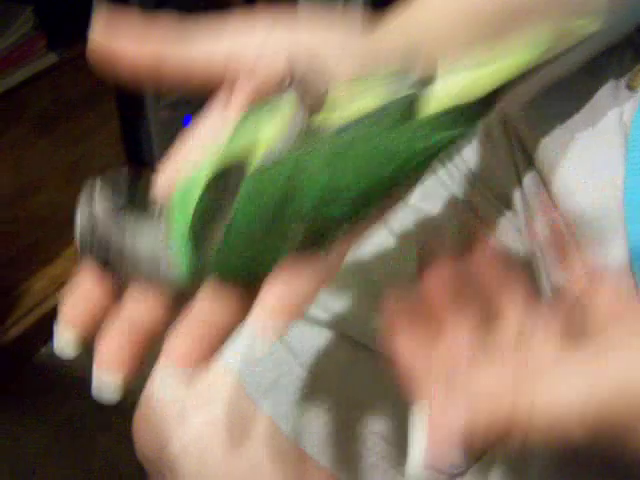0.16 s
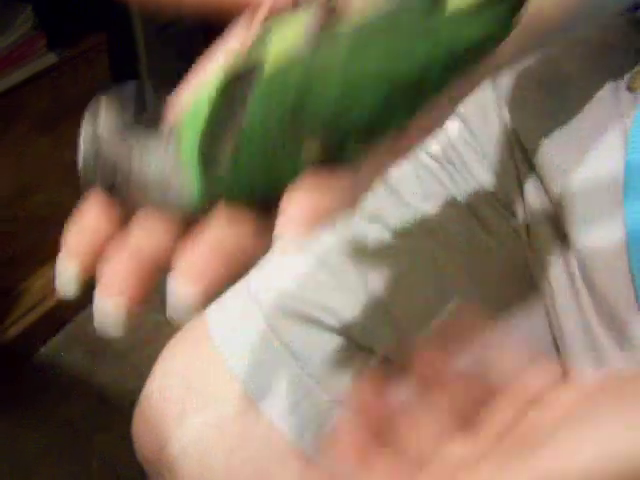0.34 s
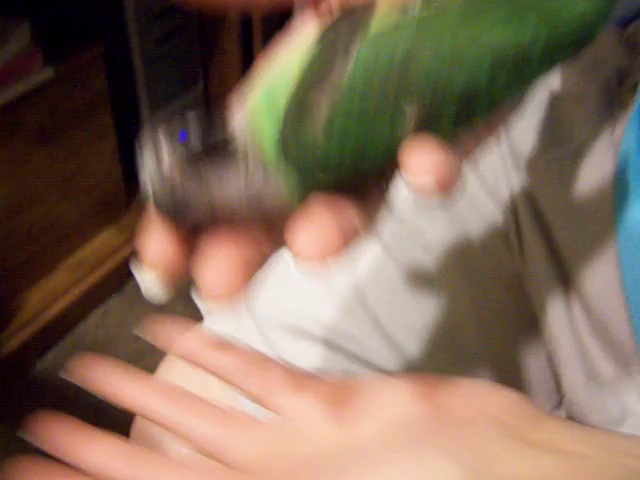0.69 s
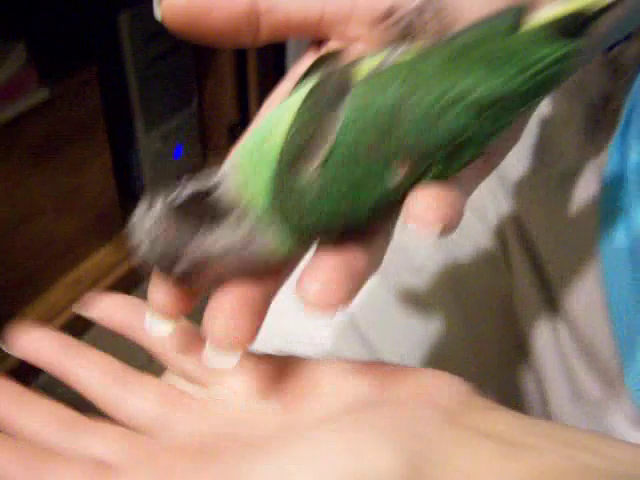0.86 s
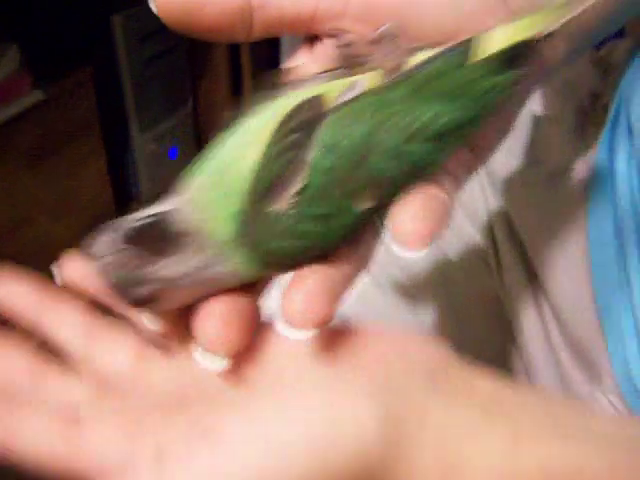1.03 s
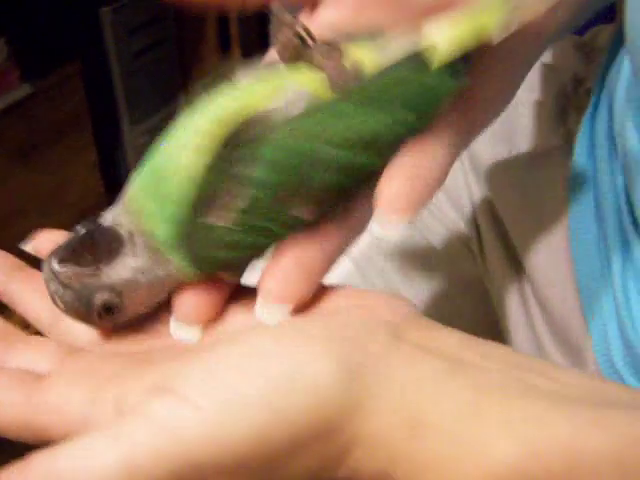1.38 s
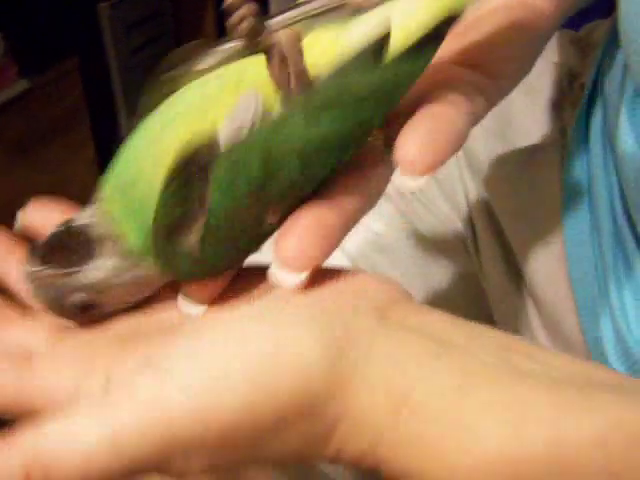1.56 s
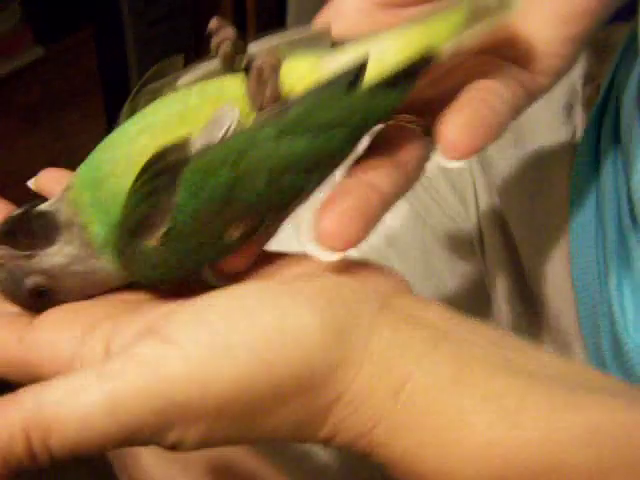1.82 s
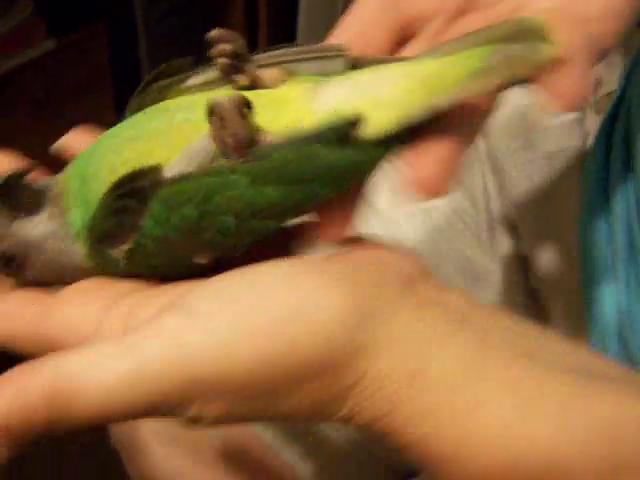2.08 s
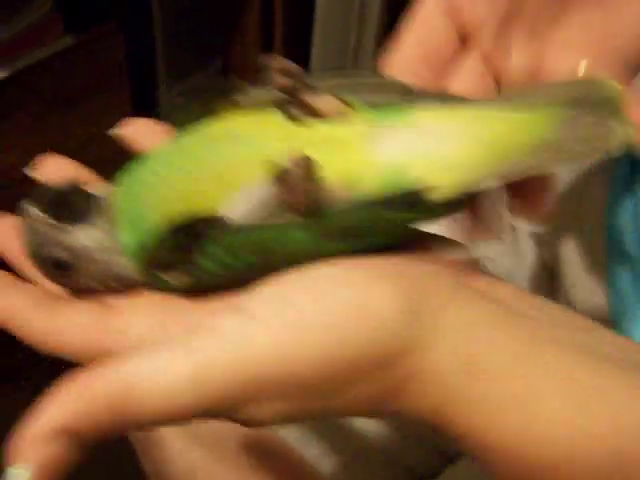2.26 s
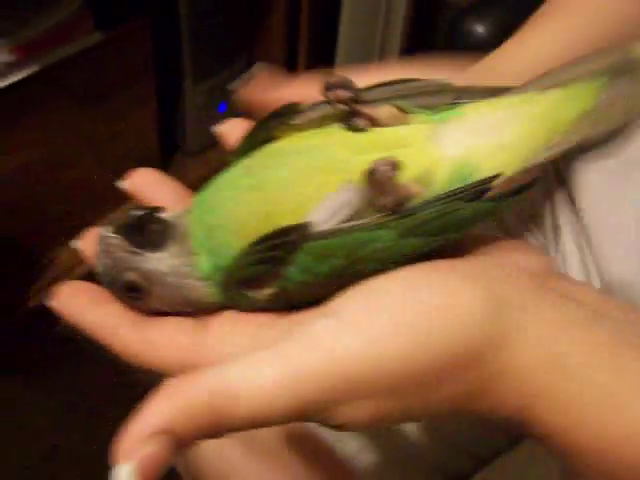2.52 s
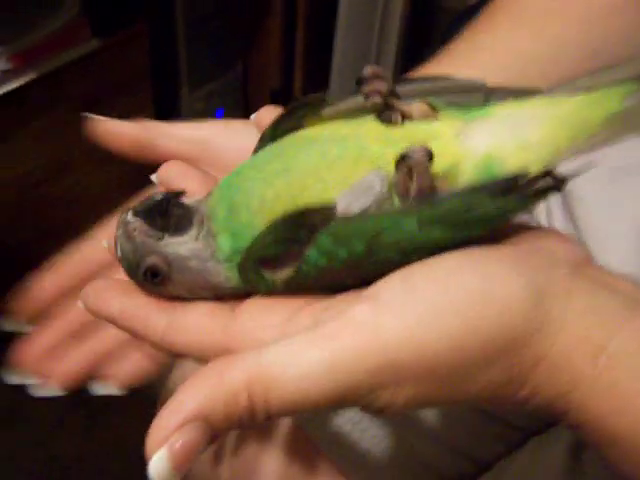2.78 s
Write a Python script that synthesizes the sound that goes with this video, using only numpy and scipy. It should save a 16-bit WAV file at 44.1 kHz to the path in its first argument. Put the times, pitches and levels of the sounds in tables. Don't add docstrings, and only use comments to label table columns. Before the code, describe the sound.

Quick parrot chirps rise, fall and overlap for the first stretch, thin out, then return with upward glides and a loud arched squeak, over constant soft appliance hum in a short-echo living room, narrow-band microphone.

```python
import sys
import numpy as np
from scipy import signal
from scipy.fft import rfft, irfft, next_fast_len
from scipy.io import wavfile
from scipy.ndimage import uniform_filter1d, map_coordinates

SR = 44100
rng = np.random.default_rng(int(sys.argv[2]) if len(sys.argv) > 2 else 0)


def invert_db(level):
    return 10 ** (np.asarray(level, dtype=float) / 20)


def master_out(mix):
    frames = np.transpose(np.atleast_2d(mix))
    ceiling = np.clip(frames, -1, 1)
    pcm = np.round(ceiling * 32767).astype(np.int16)
    wavfile.write(sys.argv[1], SR, pcm)


N = 127890


def unit(x):
    return x / np.sqrt(np.mean(x ** 2) + 1e-20)


def along(points, hz):
    f, v = np.transpose(points)
    return np.interp(np.log(hz + 1), np.log(f + 1), v)


def wobble(rate_hz, size):
    knots = rng.standard_normal(int(size * 3000 / SR) + 4)
    return map_coordinates(knots, [np.arange(size) * min(rate_hz, 2900) / SR])


def rush(spectrum):
    patchy_db, patch_rate_hz = -2, 19
    m = next_fast_len(N + 8192)
    gain = invert_db(along(spectrum, np.fft.rfftfreq(m, 1 / SR)))
    x = irfft(rfft(rng.standard_normal(m)) * gain, m)[:N]
    return unit(x) * invert_db(patchy_db * wobble(patch_rate_hz, N))


def motor():
    # multiple of shaft rate, level/dB
    orders = [(2, -61.5), (3, -55.5), (4, -59), (5, -46.5), (6, -50), (7, -57), (10, -54.5), (15, -51),
              (20, -56), (25, -45), (30, -46.5), (35, -42), (40, -46.5), (45, -53.5), (78, -72),
              (79, -72.5), (82, -58.5)]
    # f/Hz, density/dB per Hz
    rumble = [(12, -44.5), (20, -10), (334, -5), (383, -13), (509, -9.5), (885, -10.5), (1100, -16),
              (1430, -51), (2420, -120)]
    # f/Hz, density/dB per Hz
    air_noise = [(650, -55), (1100, -16.5), (1800, -9), (2800, -6), (3700, -14), (5200, -20.5),
                 (6300, -24.5), (8600, -36)]
    shaft_hz, waver_db, waver_hz = 76.84, 2.5, 1.2
    rumble_db, air_db = -44.5, -37

    t = np.arange(N) / SR
    shaft = 2 * np.pi * shaft_hz * t
    drift = 2 * np.pi * waver_hz * np.cumsum(wobble(7.3, N)) / SR / 10
    hum = 0
    for k, db in orders:
        gain = np.sqrt(2) * invert_db(db + waver_db * wobble(12, N))
        phase = round(k) * shaft + np.sqrt(k) * drift + rng.uniform(0, 2 * np.pi)
        hum = hum + gain * np.sin(phase)
    return hum + invert_db(rumble_db) * rush(rumble) + invert_db(air_db) * rush(air_noise)


def room(x):
    # f/Hz, t60/s
    t60 = [(1000, 0.25), (3000, 0.3), (8000, 0.27)]
    delay_s = .003
    hz, t, z = signal.stft(rng.standard_normal(SR // 2), SR, nperseg=256)
    decay = invert_db(-60 * t / along(t60, hz)[:, None])
    tail = signal.istft(z * decay, SR, nperseg=256)[1]
    delayed = np.pad(x, (round(delay_s * SR), 0))
    return signal.fftconvolve(delayed, tail / np.linalg.norm(tail))[:N]


def squeak(rows, rough, half_db=None, third_db=0):
    # f/Hz, gain/dB
    beak = [(1300, -0.5), (2000, 0), (2900, 6), (3600, 6), (4500, 4), (6000, -2), (7000, -13), (9000, -30)]
    warble_rate_hz, edge_s = 450, .007
    flutter_db, flutter_rate_hz = 2.5, 140
    breath_db, breath_rate_hz = -20, 500

    s, hz, db, step_db = np.transpose(rows)
    t = np.arange(round((s[-1] - s[0]) * SR)) / SR + s[0]
    hz, db, step_db = (np.interp(t, s, column) for column in (hz, db, step_db))
    jitter = 1 + rough * wobble(warble_rate_hz, len(t))
    phase = 2 * np.pi * np.cumsum(hz * jitter) / SR
    main = 1 if half_db is None else 2
    tone = 0
    for k in range(1, 6):
        line_db = step_db * (k - main) if k >= main else half_db
        if k == 3:
            line_db = line_db + third_db
        grain_db = flutter_db * np.sqrt(k / main) * wobble(flutter_rate_hz, len(t))
        beak_db = along(beak, k * hz) - along(beak, main * hz)
        tone = tone + invert_db(line_db + grain_db + beak_db) * np.sin(k * phase)
    breath = 1 + invert_db(breath_db) * wobble(breath_rate_hz, len(t))
    fade = np.clip(np.minimum(t - t[0], t[-1] - t) / edge_s, 0, 1)
    return np.sqrt(2) * invert_db(db) * fade * breath * tone


def squawk_rows(s, length_s, hz0, hz1, db):
    step_db, sag, swell_db = -3.5, 0.55, 4.5
    return [(s, hz0, db - swell_db, step_db),
            (s + length_s / 2, hz0 + sag * (hz1 - hz0), db, step_db),
            (s + length_s, hz1, db - swell_db, step_db)]


def parrots():
    # t/s, pitch/Hz, level/dB, overtone step/dB
    first = [
        [(0.0, 3120, -29, -20), (0.03, 3195, -36.5, -31), (0.06, 2930, -59, -28)],
        [(0.06, 1852, -36.5, -17.5), (0.074, 1862, -32.5, -2), (0.1, 1853, -60, -7)],
        [(.093, 2880, -31, -15), (.118, 2910, -23, -15)],
        [(.137, 2900, -27, -20), (.157, 2890, -19, -22), (.175, 2880, -33, -22), (.22, 2850, -41, -22)],
        [(0.225, 1694, -70, -10), (0.239, 1760, -36, -9), (0.27, 2016, -45, -3)],
        [(.245, 2800, -33, -12), (.275, 2910, -21, -17), (.3, 2975, -24, -13), (.32, 3050, -22, -20),
         (.34, 3210, -25, -22), (.355, 3050, -30, -22)],
        [(.32, 1540, -32, -15.5), (.36, 1506, -26.5, -23), (.38, 1535, -27.5, -7.5), (.4, 1603, -23, -17),
         (.422, 1465, -24, -16.5), (.44, 1342, -23, -18), (.465, 1317, -16, -22), (.482, 1352, -28, -22),
         (.51, 1352, -21, -24.5)],
    ]
    second = [
        [(.445, 2069, -30, -5.5), (.46, 2101, -33, -8.5), (.49, 2130, -27, -10), (.513, 2369, -23, -9.5),
         (.525, 2902, -16, -28.5), (.59, 2876, -23, -20), (.65, 2870, -19, -12), (.663, 2880, -34, -24)],
        [(.597, 1740, -36.5, -8), (.613, 1880, -25.5, -5.5), (.635, 1870, -40, -10)],
        [(.768, 1508, -43.5, -12), (.8, 1740, -35.5, -3.5), (.815, 1860, -34.5, -6), (.84, 1790, -43, -7)],
        [(.93, 2220, -33, -1.5), (.97, 2272, -29, -8), (1.015, 2490, -27, -12), (1.055, 2767, -18, -26),
         (1.095, 2980, -19.5, -18.5), (1.15, 2838, -19.5, -22.5), (1.19, 2647, -26.5, -14),
         (1.225, 2180, -37.5, -18), (1.26, 1950, -48.5, -12)],
    ]
    third = [
        [(1.59, 2740, -38.5, -2), (1.626, 2674, -32, -30), (1.69, 3690, -44, 7)],
        [(1.718, 1618, -36.5, -6.5), (1.74, 1748, -29, -3), (1.76, 1932, -29.5, -6), (1.78, 2230, -24, -20),
         (1.81, 2540, -18.5, -29), (1.845, 2723, -21, -24), (1.865, 2870, -32, -4.5), (1.9, 3030, -24, -4.5)],
        [(1.895, 1530, -26, -15.5), (1.93, 1496, -29.5, -5), (1.98, 1528, -25.5, -8), (2.005, 1508, -26.5, -14),
         (2.035, 1494, -37, -13.5)],
        [(2.045, 1520, -33, -16), (2.075, 1700, -31, -18), (2.125, 1790, -33, -18), (2.15, 2100, -33, -18),
         (2.18, 2551, -18.5, -17), (2.21, 2736, -14.5, -16), (2.24, 3193, -17, -30), (2.275, 2838, -14.5, -16),
         (2.35, 2440, -27.5, -11)],
    ]
    fourth = [
        [(2.32, 2100, -32.5, 0), (2.36, 2030, -37.5, -0.34), (2.4, 2011, -34, -1), (2.435, 2050, -34.5, 0.53),
         (2.46, 2070, -43, -2)],
        [(2.53, 2000, -37.5, -9), (2.564, 1944, -45.5, -3.5), (2.62, 2903, -17.5, -26.5),
         (2.674, 3079, -20, -22), (2.732, 3076, -20.5, -26), (2.77, 2770, -23.5, -23),
         (2.797, 2322, -32, -20.5), (2.82, 2050, -34, -15)],
        [(2.82, 1383, -43, -2), (2.85, 1617, -36.5, -2), (2.9, 1920, -29.5, -1.5)],
        [(1.01, 1555, -22.5, -29), (1.045, 1405, -46, -32)],
        [(.145, 2592, -26, -4), (.16, 2148, -25.5, -20.5), (.185, 1530, -38.5, -19.5)],
        [(1.895, 2500, -32, -20), (1.93, 1560, -35, -2), (1.98, 1370, -35, -2)],
    ]
    fifth = [
        [(.303, 2700, -22, -22), (.32, 2635, -21, -21), (.342, 2746, -24.5, -23.5), (.37, 2810, -33.5, -20)],
        [(.422, 1782, -31, -5), (.438, 1771, -22.5, -9), (.455, 1794, -34, -2), (.485, 1800, -42.5, -8.5)],
        [(.585, 2600, -31, -1), (.635, 2498, -20.5, -15.5), (.66, 2550, -31.5, -11.5)],
        [(.666, 2867, -23, -21), (.684, 2770, -15.5, -22)],
        [(.853, 1508, -37, -9), (.88, 1740, -36, -7.5), (.92, 1902, -32.5, -3), (.96, 1968, -32.5, -10.5),
         (1.005, 2027, -37, -7)],
        [(2.428, 2660, -26.5, 0), (2.45, 2693, -26, 0.5), (2.485, 2624, -44, -8)],
    ]
    whistle_rough = [.01, .015, .005, .007, .02, .025, .03, .025, .05, .02, .04, .04, .025, .05, .025, .04,
                     .025, .025, .05, .08, .06, .045, .012, .05, .04, .028, .045]
    split_db = {6: -9, 8: -8, 13: -20, 22: -3}
    muted_db = {7: -15, 12: -10, 14: -6, 15: -7, 17: -7, 25: 4}
    # t/s, length/s, start pitch/Hz, end pitch/Hz, level/dB
    squawks = [(.46, .07, 1900, 2500, -33), (.655, .033, 2500, 1700, -29), (.81, .045, 2400, 1516, -41),
               (.68, .047, 2300, 2000, -30), (1.607, .065, 1750, 1850, -41), (.315, .05, 2300, 2000, -37),
               (1.92, .085, 2500, 2450, -39), (1.987, .17, 1964, 1927, -40), (2.137, .28, 1999, 2072, -36),
               (2.41, .075, 2250, 2500, -29), (.95, .15, 2050, 2450, -38)]
    squawk_rough = [.15, .07, .07, .12, .16, .12, .1, .14, .14, .2, .09]
    mic_band_hz = 1280, 7160

    calls = []
    for i, rows in enumerate(first + second + third + fourth + fifth):
        calls.append((rows, whistle_rough[i], split_db.get(i), muted_db.get(i, 0)))
    for squawk, rough in zip(squawks, squawk_rough):
        calls.append((squawk_rows(*squawk), rough, None, 0))

    voices = np.zeros(N + SR)
    for rows, rough, half_db, third_db in calls:
        call = squeak(rows, rough, half_db, third_db)
        start = max(round(rows[0][0] * SR), 0)
        voices[start:][:len(call)] += call
    mic_filter = signal.butter(3, mic_band_hz, "bandpass", fs=SR, output="sos")
    return signal.sosfilt(mic_filter, voices[:N])


def scene():
    direct_db, room_db = -1, .3
    birds = parrots()
    return (invert_db(direct_db) * birds + invert_db(room_db) * room(birds) + motor())[None]


def top_cut(x):
    return signal.sosfilt(signal.butter(12, 8830, fs=SR, output="sos"), x)


def record(dry):
    # f/Hz, gain/dB
    camera = [(7800, 0), (8500, -8), (9100, -30)]
    knee_db, window_s, squeeze = -23, .07, .3
    taps = int(window_s * SR)
    power = uniform_filter1d(dry ** 2, taps, origin=(taps - 1) // 2)
    level_db = 10 * np.log10(np.abs(power) + 1e-9)
    ducked = dry * invert_db(-squeeze * np.maximum(level_db - knee_db, 0))
    response = invert_db(along(camera, np.fft.rfftfreq(N, 1 / SR)))
    return top_cut(irfft(rfft(ducked) * response, N))


dry = scene()
out = record(dry)
master_out(out)
```